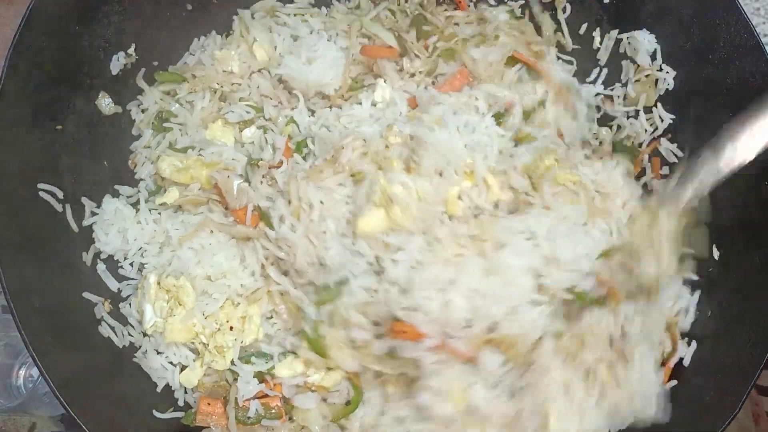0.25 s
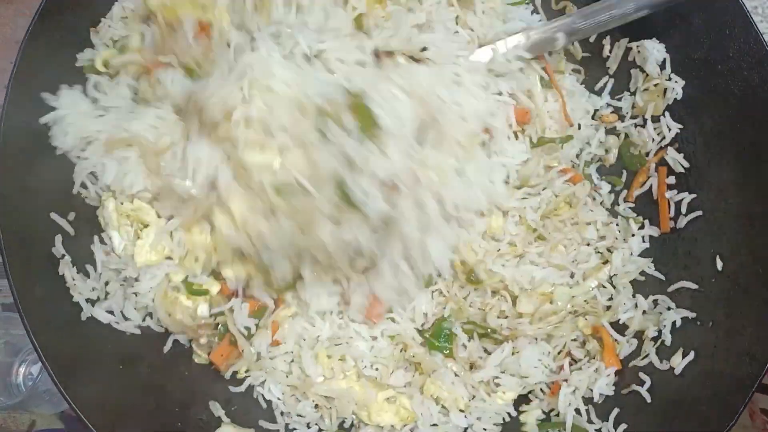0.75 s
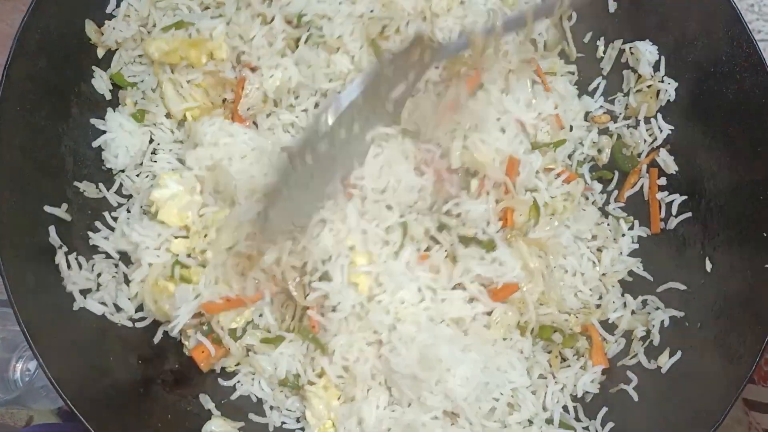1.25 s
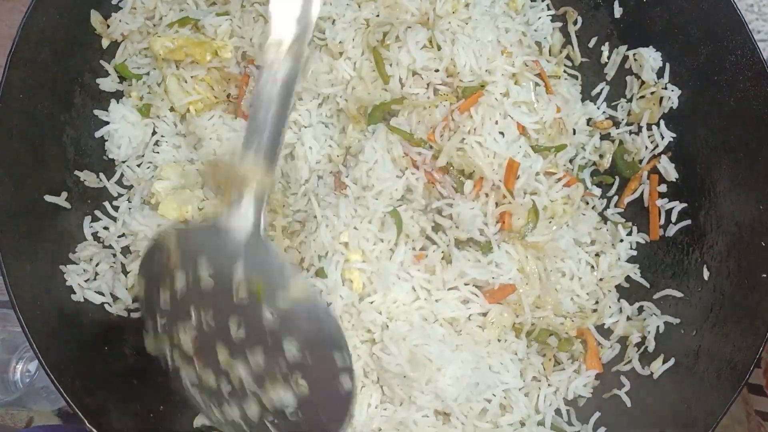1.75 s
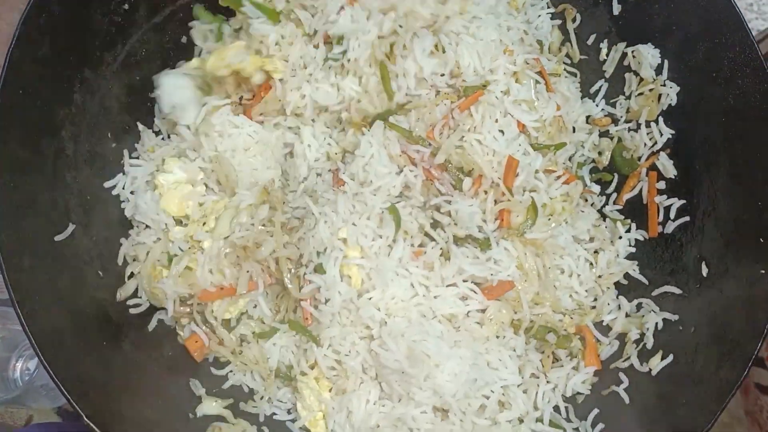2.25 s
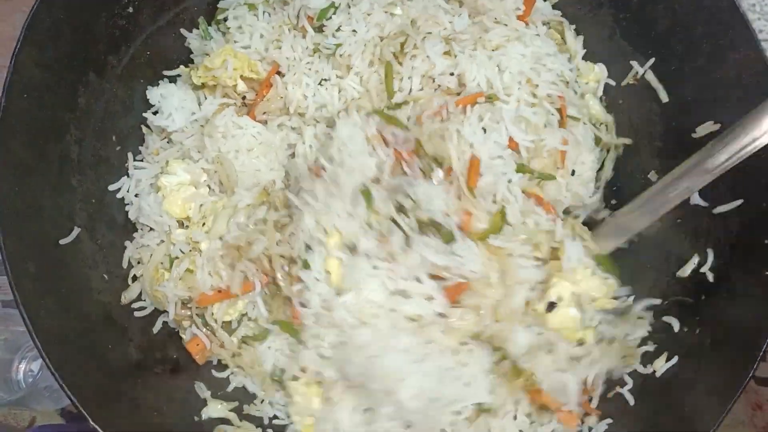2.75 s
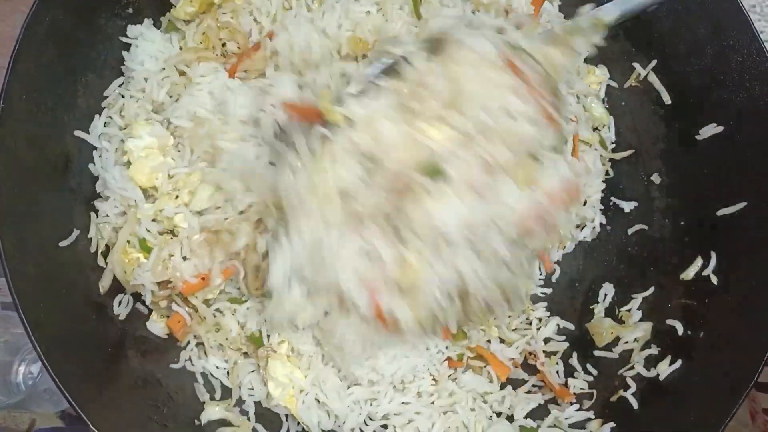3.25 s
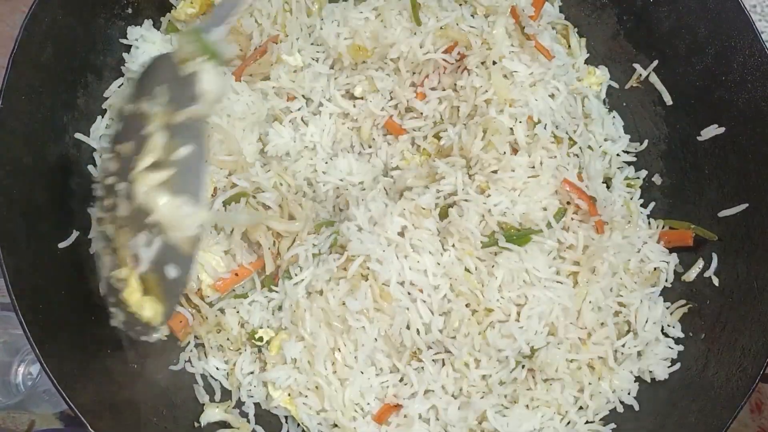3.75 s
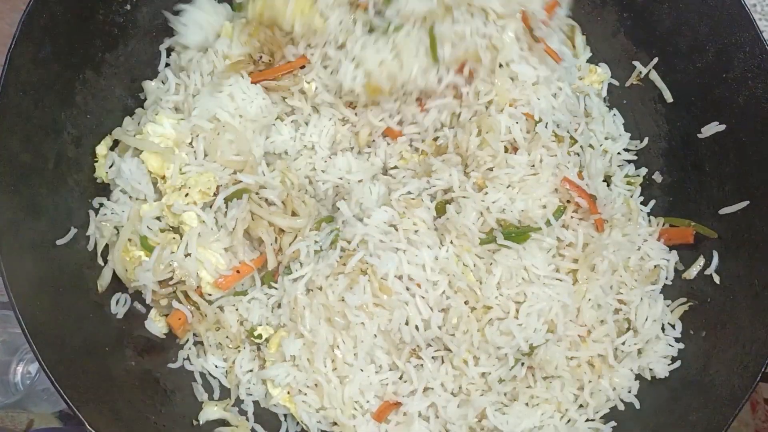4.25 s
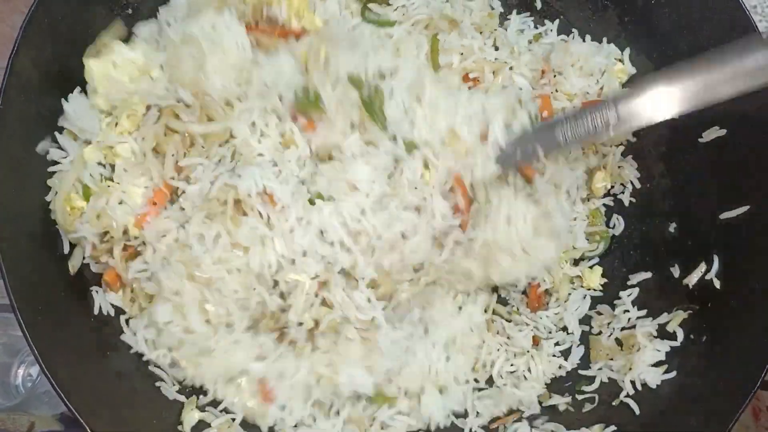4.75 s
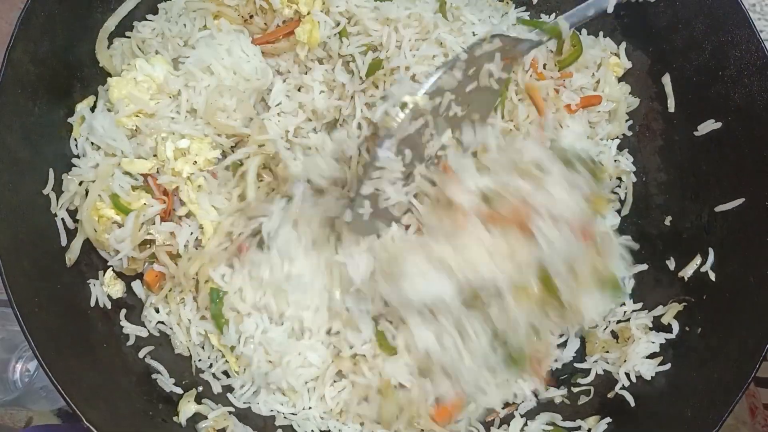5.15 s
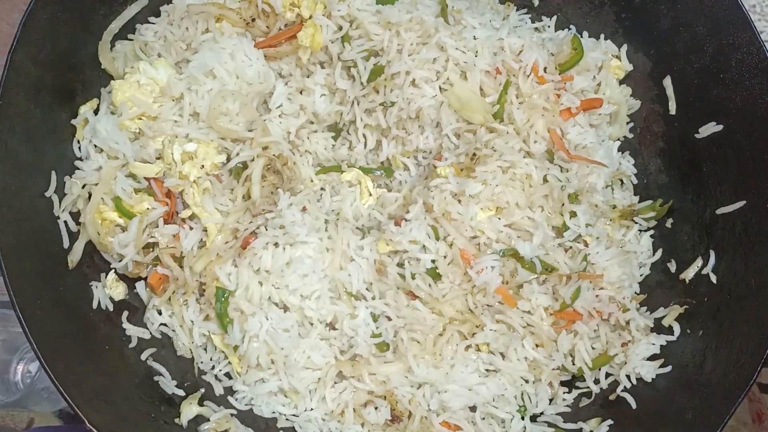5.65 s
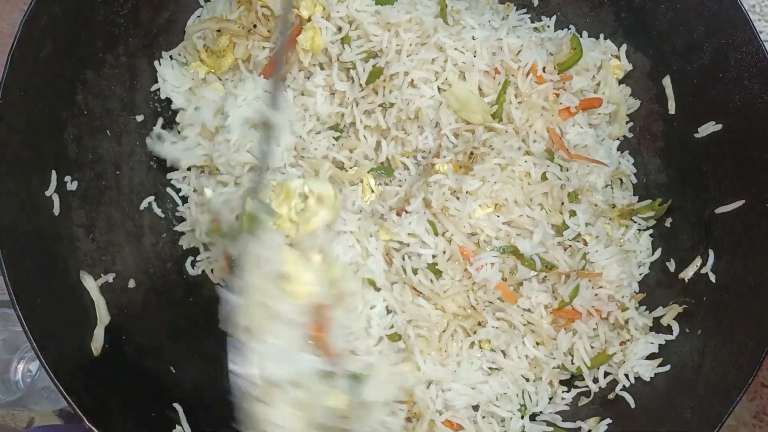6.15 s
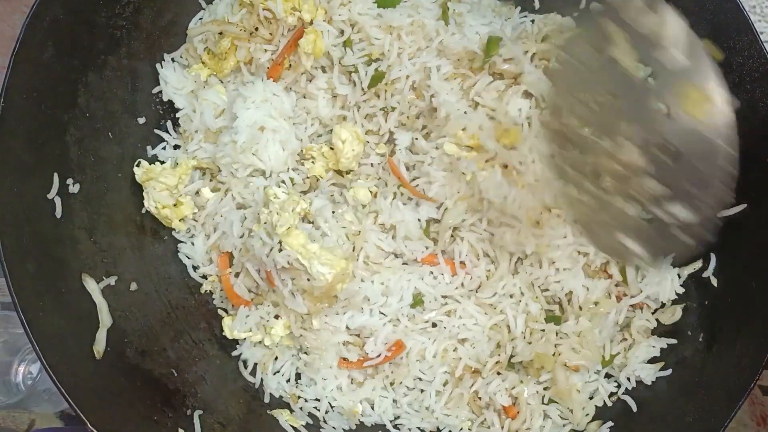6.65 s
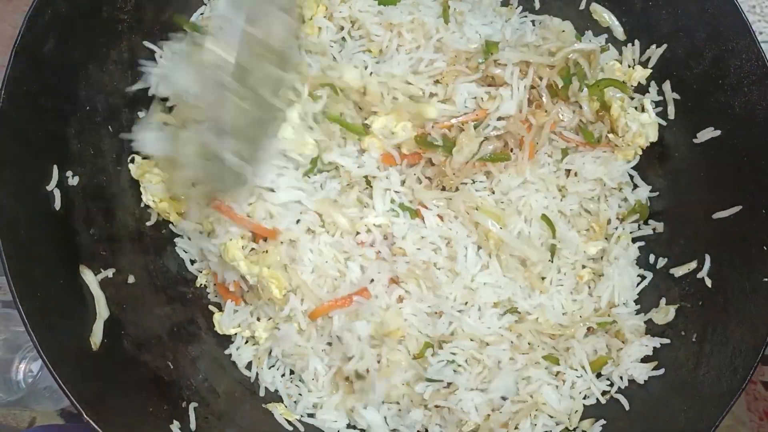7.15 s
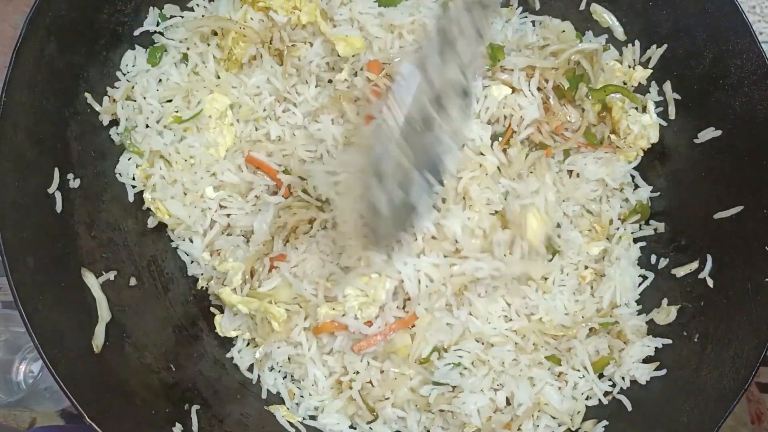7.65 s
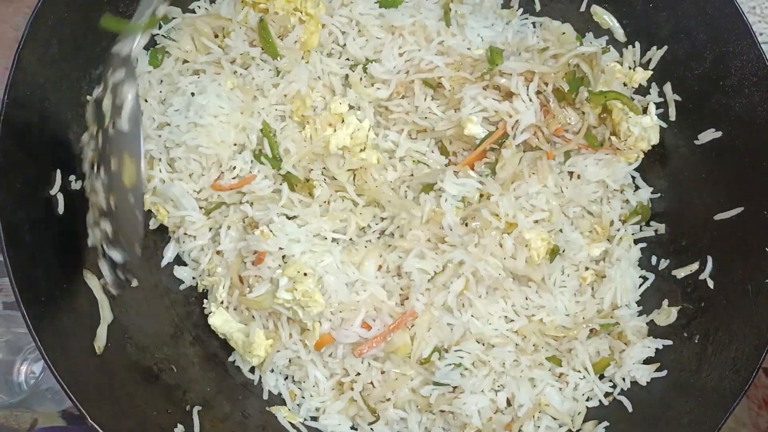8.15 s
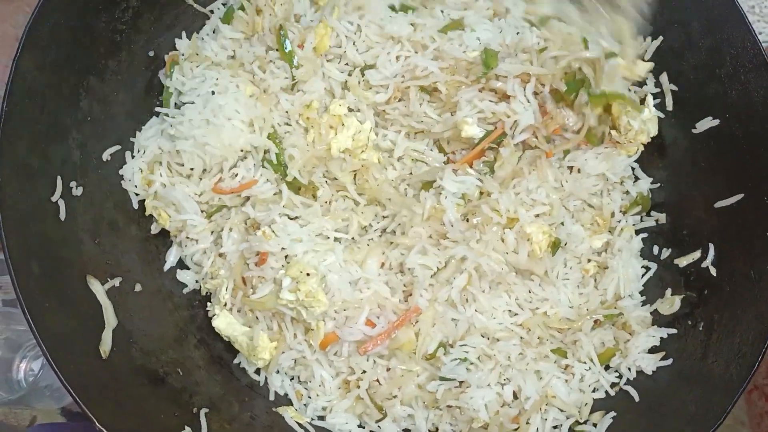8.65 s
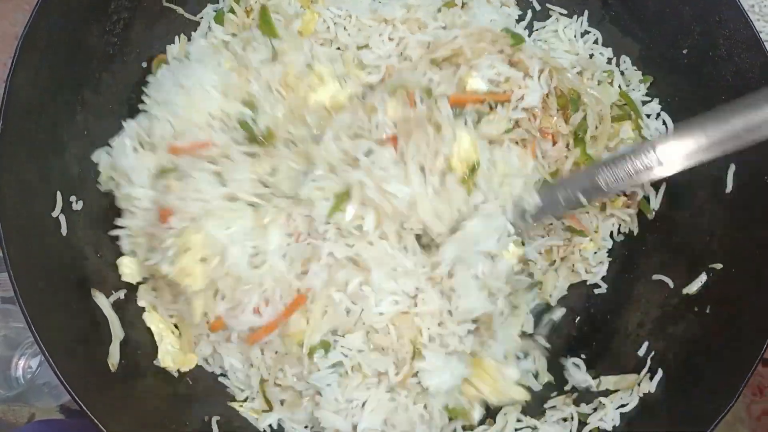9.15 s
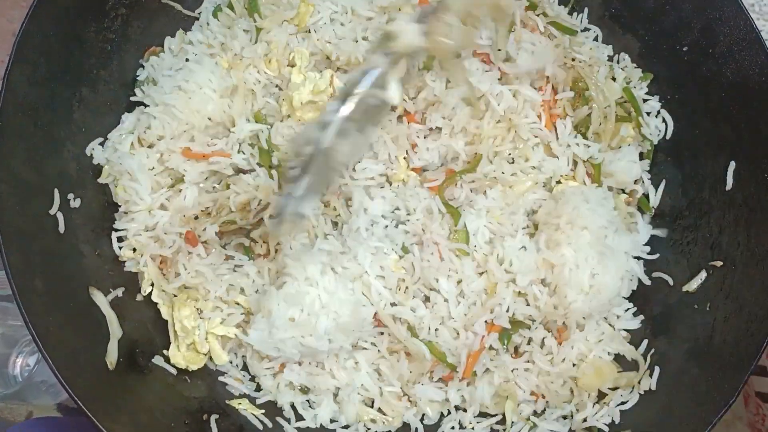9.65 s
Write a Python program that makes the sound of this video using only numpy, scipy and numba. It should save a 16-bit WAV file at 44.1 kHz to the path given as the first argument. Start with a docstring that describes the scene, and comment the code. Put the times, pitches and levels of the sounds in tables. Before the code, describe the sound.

Throughout, rice fries with a light, dense sizzle of tiny crackles, a little uneven, over faint low burner and room air. From 0.1 to 0.8 s wet rice rustles and a spatula scoops softly, with a few oil pops and a slight scrape near 0.9. Two short metal knocks on the rim ring at 1.3 and 1.5 s. A bright, gritty scrape of steel on steel runs from 2.0 to 2.45. Softer scoops follow at 2.8 and 4.6 to 4.8, around a clink at 3.95 and a rising scrape until 4.4. Another scrape runs 5.8 to 6.35, loudest near 6.05 and 6.3. Oil pops cluster from 6.6 to 8.1, with a faint hollow tap at 7.0. A clank at 8.2 leads into a strong scrape from 8.35 to 8.75 with a dull wok wobble. A light scoop at 9.1 leaves the sizzle alone to the end, just before 10 s. Close stereo, dry and crisp.

```python
"""At a hot steel wok, fried rice sizzles, heard from close above by two microphone ports of unlike colour.
The sizzle is thousands of random clicks, each turned into a short puff of noise; louder oil pops stand out.
A metal spatula knocks on the rim, lands on the steel and scrapes round the bowl under the rice:
blows ring the steel's modes (its natural pitches), and scraping drives them with many tiny slips.
The wok rocks dully on its stand, a small hollow thing is tapped farther off, and low air noise lies beneath."""
import sys
import numpy as np
from scipy import signal
from scipy.fft import rfft, irfft, next_fast_len
from scipy.io import wavfile
from scipy.ndimage import uniform_filter1d
from numba import njit

SR = 44100
rng = np.random.default_rng(int(sys.argv[2]) if len(sys.argv) > 2 else 0)


def int16_out(signal):
    """Quantize to a 16-bit WAV file."""
    q = np.round(np.clip(np.atleast_2d(signal).T, -1, 1) * 32767)
    wavfile.write(sys.argv[1], SR, q.astype(np.int16))


N = 436149   # length in samples

# natural pitches of wok and spatula, with relative levels for each kind of touch:
# (pitch_hz, free_t60_s, knock_db, landing_db, scrape_db, left_minus_right_db)
STEEL_MODES = [(108.7, 0.33, -2, -19, -44.5, 2), (157, 0.28, 4, -39, -50, 1), (240, 0.16, -12, 6.5, -39, 3),
               (344, 0.14, -27, -16, -37, 2), (451.4, 0.17, -14.5, -33.5, -35.5, 20),
               (470, 0.22, -10.5, -27.5, -31, -18.5), (884, 0.015, 7, -21, -42.5, -1.5),
               (905, 0.053, 9.5, -36, -40, -16), (996, 0.22, -4, -16.5, -40, -9.5),
               (1084, 0.0063, 8, -44, -40, -6), (1233, 0.038, -9, 7.5, -12.5, -4),
               (1540, 0.11, -6, -7, -33, 8.5), (1802, 0.049, -17, 3, -14.5, 3.5),
               (2174, 0.055, -14, 11, -16, -9), (2295, 0.048, -9, -7, -10, -2),
               (2427, 0.097, -12, -26, -13.5, -6.5), (2585, 0.25, -4.5, -28, -22, -6),
               (3134, 0.021, -22, 18.5, -6, 3.5), (3320, 0.11, -33, 7, -17, -12),
               (3322, 0.039, -23, 16.5, -14, -17), (3664, 0.075, -26, 14.5, -11, 14.5),
               (4070, 0.065, -25, -18, -14, -25), (4406, 0.044, -25, 5.5, -4, 22.5),
               (4332, 0.056, -15, -4, -3.5, -7.5), (4399, 0.059, -30, -17, -1, 2.5),
               (4516, 0.091, -7, 2.5, -4.5, 21.5), (4500, 0.26, -9.5, 5, -29, 3.5),
               (4710, 0.09, -22, 10, -0.5, 6), (5060, 0.11, -19.5, -1, -15, 17.5),
               (6780, 0.05, -23, -7, -23.5, 23.5)]
BODY_TOP_HZ = 1100   # modes below this are the body of a blow; scraping rings only those above


def amp(db):
    """Gain of a level in dB."""
    return 10 ** (np.asarray(db) / 20)


def rms_one(x):
    """Scale a sound to an average strength (rms) of 1."""
    return x / np.sqrt(np.mean(x ** 2) + 1e-20)


def band(x, low_hz, high_hz, order):
    """Keep only the sound between two pitches."""
    return signal.sosfilt(signal.butter(order, [low_hz, high_hz], "band", fs=SR, output="sos"), x)


def high_pass(x, hz, order):
    """Weaken the sound below a pitch."""
    return signal.sosfilt(signal.butter(order, hz, "high", fs=SR, output="sos"), x)


def in_time(tables):
    """Columns of joined tables at every sample, and a gate that is open within the tables."""
    t = np.arange(N) / SR
    s, *columns = np.concatenate(tables).T
    gate = sum((t > rows[0][0]) & (t < rows[-1][0]) for rows in tables)
    return [np.interp(t, s, c) for c in columns], uniform_filter1d(gate * 1., size=600)


def swells(events, rise_db_per_s, fall_db_per_s, rest_db):
    """Level in dB of events that rise, hold and fall; the loudest counts."""
    start, length, peak_db = np.transpose(events)[:, :, None]
    t = np.arange(0, N + 50, 50) / SR   # every 50th sample is enough
    under_db = np.maximum(rise_db_per_s * (start - t), fall_db_per_s * (t - start - length))
    loudest_db = np.max(peak_db - np.maximum(under_db, 0), axis=0)
    return np.interp(np.arange(N) / SR, t, np.maximum(loudest_db, rest_db))


def colour(x, hz, db):
    """Minimum-phase filter with the given levels on a log-frequency axis."""
    size = next_fast_len(N + 8192)
    grid = np.maximum(np.fft.rfftfreq(8192, 1 / SR), 10)
    cepstrum = irfft(np.log(amp(np.interp(np.log(grid), np.log(hz), db))))
    # folding the cepstrum forward makes the filter respond as early as it can
    cepstrum[1:4096] *= 2
    cepstrum[4097:] = 0
    response = irfft(np.exp(rfft(cepstrum)))
    return irfft(rfft(x, size) * rfft(response, size), size)[..., :N]


def drift(rate_hz):
    """Slow random wandering of spread 1, computed at every 20th sample."""
    r = np.exp(-2 * np.pi * rate_hz * 20 / SR)
    noise = rng.standard_normal(N // 20 + 2002)
    slow = signal.lfilter([1], [1, -2 * r, r * r], noise)[2000:]
    return np.interp(np.arange(N) / 20, np.arange(len(slow)), rms_one(slow))


def clicks(times, gains):
    """A click at each time."""
    out = np.zeros(N)
    out[np.round(np.asarray(times) * SR).astype(int)] = gains
    return out


def grains(per_s, spread_db, clump_db, clump_hz):
    """Clicks at random moments, of uneven size, coming in clumps."""
    sizes = amp(spread_db * np.minimum(rng.exponential(1, N), 4)) * rng.choice([-1, 1], N)
    chance = per_s * amp(clump_db * drift(clump_hz)) / SR
    return rms_one(sizes * (rng.random(N) < chance))


def bursts(x, t60, shared):
    """Each click becomes a dying puff of reflections in the bowl, only partly alike at the two ports."""
    puff = np.sqrt(signal.lfilter([1], [1, -amp(-120 / (t60 * SR))], x ** 2 + 1e-18))
    noise, share = rng.standard_normal((3, N)), np.clip(shared, 0, 1)
    return rms_one(puff * (np.sqrt(share) * noise[0] + np.sqrt(1 - share) * noise[1:]))


def ring(force, hz, t60):
    """Complex ringing of one mode; its imaginary part is a sine of height 1 for a unit click."""
    pole = amp(-60 / (t60 * SR)) * np.exp(2j * np.pi * hz / SR)
    return signal.lfilter([1], [1, -pole], force + 1e-18)


@njit
def gliding_ring(force, turn, r):
    """A resonance whose pitch moves."""
    out, z = np.zeros(len(force)), 0j
    for i in range(len(force)):
        z = z * r * np.exp(1j * turn[i]) + force[i]
        out[i] = z.imag
    return out


def gliding(hz, width_hz):
    """Noise twice through a moving resonance; rms 1."""
    turn, r = 2 * np.pi * hz / SR, np.exp(-np.pi * width_hz / SR)
    once = gliding_ring(rng.standard_normal(N), turn, r)
    return rms_one(gliding_ring(once, turn, r))


def port_turns(hz):
    """Random phase of each mode at the right port: high modes arrive out of step."""
    return rng.uniform(-np.pi, np.pi, np.shape(hz)) * np.minimum(hz / 2500, 1) ** 2


def air():
    """Low steady noise of burner and room air, alike at both ports in the bass."""
    # colour of the air noise: (pitch_hz, level_db)
    air_colour = [(18, -44), (30, -17), (75, -14), (124, 4), (290, -4.5), (414, -12), (490, -7),
                  (895, -13.5), (1060, -6.5), (1200, -18.5), (1560, -44.5), (2640, -120)]
    mid, side = colour(rng.standard_normal((2, N)), *np.transpose(air_colour))
    side = high_pass(side, 500, order=1)
    return amp(-67.5) * rms_one(mid + 0.61 * side * [[1], [-1]])


def taps():
    """A soft blow on a small hollow thing: a dying puff of contact noise drives its modes."""
    # taps farther off: (start_s, relative level_db)
    tap_times = [(5.036, -44), (6.983, -36)]
    # natural pitches of the hollow thing: (pitch_hz, level_db, t60_s)
    tap_modes = [(728, 5, 0.1), (670, 0, 0.099), (418, -4, 0.09), (230, -23, .07)]
    s, level_db = np.transpose(tap_times)
    fading = signal.lfilter([1], [1, -amp(-60 / (0.081 * SR))], clicks(s, amp(level_db - 37)))
    contact = fading * rng.standard_normal((2, N))
    struck = sum(amp(db) * ring(contact[0] + 0.55 * contact, hz, t60).imag for hz, db, t60 in tap_modes)
    return band(struck, 170, 850, order=2)


def rocking():
    """The loaded wok shudders on its stand: noise rings one low, quickly dying resonance."""
    # the wok rocks: (start_s, length_s, level_db)
    rocks = [(1.63, 0.016, -51), (1.87, 0.023, -47), (3.99, 0.04, -55), (6.385, .03, -55),
             (7.54, 0.025, -56.5), (8.3, .04, -46), (8.74, 0.14, -49)]
    shudder = ring(rng.standard_normal(N), 122.6, 0.065).imag
    shudder = band(shudder, 95, 190, order=2)
    return rms_one(shudder) * amp(swells(rocks, rise_db_per_s=300, fall_db_per_s=400, rest_db=-120))


def blows():
    """Knocks and landings ring the steel's modes, over a rattle that dies band by band."""
    # spatula on the rim, levels relative: (start_s, level_db, body_db, thud_db)
    knocks = [(1.291, -8.5, -9, -26), (1.464, -9.5, -9.5, -28)]
    # spatula edge meets the steel, levels relative: (start_s, level_db, body_db, thud_db)
    landings = [(2.005, -30, -47, -47), (3.945, -16.5, -4.5, -28), (4.2325, -31.5, -35, -58),
                (5.7578, -32, -25, -44), (8.2246, -21, -6, -32.5), (8.3432, -40, -22, -37)]
    # dense rattle after a blow, relative to its level: (low_hz, high_hz, level_db, t60_s)
    knock_rattle = [(90, 900, -19.5, 0.3), (610, 1070, -7.5, 0.031), (1870, 5140, -16, 0.075)]
    landing_rattle = [(189, 550, -31, 0.21), (2870, 5000, -6, 0.041), (5500, 16000, -18, .02)]
    thud_top_hz, scatter_db = 270, 1.5   # modes below are the thud; random spread of mode levels
    hz, t60, knock_db, land_db, _, pan_db = np.transpose(STEEL_MODES)[:, :, None]
    t, out = np.arange(SR // 2) / SR, np.zeros((2, N + SR))
    # (events, mode levels in dB, body lift in dB, thud lift in dB, rattle bands)
    kinds = [(knocks, knock_db - 10.5, 3.0, 22.0, knock_rattle),
             (landings, land_db - 22.0, 22.0, 30.0, landing_rattle)]
    for events, mode_db, body_lift_db, thud_lift_db, rattles in kinds:
        for s, level_db, body_db, thud_db in events:
            weight_db = np.select([hz < thud_top_hz, hz < BODY_TOP_HZ],
                                  [thud_db + thud_lift_db, body_db + body_lift_db])
            size = amp(level_db + mode_db + weight_db + scatter_db * rng.standard_normal(hz.shape))
            size = size * amp(-60 * t / t60)
            size = size * (1 - np.exp(-t * hz * 0.5))   # low modes swell in later
            beat_hz = rng.uniform(21.9, 60, hz.shape)   # split modes beat
            size = size * (1 + 0.78 * (hz > 200) * np.cos(2 * np.pi * beat_hz * t))
            phase = -2 * np.pi * hz * t   # the blow pulls the steel away first
            left = np.sum(size * amp(pan_db / 2) * np.sin(phase), axis=0)
            right = np.sum(size * amp(-pan_db / 2) * np.sin(phase + port_turns(hz)), axis=0)
            blow = np.array([left, right])
            for low_hz, high_hz, rattle_db, rattle_t60 in rattles:
                noise = rng.standard_normal((3, len(t)))
                unlike = min(low_hz / 2000, 1.5)   # higher bands differ more between the ports
                rattle = rms_one(band(noise[0] + unlike * noise[1:], low_hz, high_hz, order=2))
                blow += rattle * amp(level_db + rattle_db - 60 * t / rattle_t60)
            at = round(s * SR)
            out[:, at:at + len(t)] += blow
    return out[:, :N]


def scraping():
    """Stick-slip of the edge: the upper modes ring short, damped by the rice, and flare up unevenly."""
    # the edge scrapes the steel, one list a stroke, levels relative:
    # (time_s, edge_pressure_db, bowl_ring_db, bowl_ring_hz, blade_hum_db, blade_hum_hz)
    scrapes = [
        [(0.72, -59, -66, 986, -65, 357), (0.746, -51, -70, 1030, -76, 383), (0.786, -61, -60, 1030, -67, 373),
         (0.8, -50, -52, 1026, -63, 362), (0.85, -51, -59, 960, -58, 346), (0.884, -58, -50, 1010, -71, 358),
         (0.902, -60, -56, 992, -92, 357), (0.928, -53, -49, 983, -84, 463), (0.978, -51, -56, 984, -81, 440),
         (1.0, -59, -69, 994, -90, 413)],
        [(1.97, -51, -70, 1010, -84, 367), (2.008, -31.5, -64, 1020, -60, 362),
         (2.074, -34.5, -54, 950, -42, 372), (2.126, -26.5, -41, 930, -55, 430),
         (2.192, -25.5, -38.5, 930, -50.5, 365), (2.288, -32.5, -43, 947, -58, 463),
         (2.344, -36.5, -33.5, 956, -62.5, 422), (2.392, -36, -44, 970, -79, 414),
         (2.424, -34, -39, 960, -73, 425), (2.47, -69, -80, 930, -92, 444)],
        [(3.97, -40, -61, 1030, -47, 350), (4.04, -39.5, -48, 860, -49, 379), (4.08, -30.5, -46, 863, -53, 408),
         (4.162, -35, -50, 903, -54, 415), (4.198, -40, -50, 946, -80, 426), (4.242, -26.5, -42, 949, -58, 402),
         (4.286, -23, -39.5, 912, -68, 483), (4.328, -22.5, -43, 953, -49, 500),
         (4.388, -31, -45, 912, -75, 498), (4.43, -51, -67, 1010, -91, 403)],
        [(5.76, -38, -35, 983, -56, 393), (5.806, -52, -50, 907, -60, 413), (5.952, -35, -58, 990, -67.5, 470),
         (6.044, -26, -39, 960, -48, 507), (6.084, -28, -39.5, 970, -66, 503), (6.124, -37, -45, 944, -73, 480),
         (6.196, -39.5, -39.5, 966, -53, 522), (6.258, -36.5, -39.5, 1004, -67, 436),
         (6.33, -28, -35.5, 960, -53, 358), (6.39, -73, -59, 960, -84, 384)],
        [(8.33, -48, -74, 900, -82, 402), (8.388, -32, -45, 867, -52, 415), (8.44, -28, -36.5, 930, -68, 420),
         (8.472, -35, -45, 940, -57, 418), (8.562, -26.5, -53, 980, -58, 418),
         (8.584, -22.5, -45, 970, -60, 460), (8.672, -28, -37, 907, -50, 483),
         (8.71, -29.5, -38.5, 884, -56, 484), (8.784, -63, -53, 900, -54, 510), (8.82, -76, -53, 950, -74, 487)],
    ]
    # the blade scoops through rice and barely touches the steel: (time_s, edge_pressure_db)
    scoops = [
        [(0.28, -42), (0.286, -52), (0.356, -34), (0.558, -38), (0.576, -58), (0.6, -40)],
        [(2.74, -55), (2.8, -41), (2.818, -34.5), (2.898, -40), (2.924, -46), (2.96, -44)],
        [(4.56, -58), (4.58, -46), (4.608, -33), (4.772, -45), (4.79, -36.5), (4.86, -63)],
        [(8.97, -48), (8.986, -52), (8.99, -60), (9.004, -42.5), (9.11, -37.5), (9.22, -57)],
    ]
    # colour of the rasp, relative: (pitch_hz, left_db, right_db)
    rasp_colour = [(500, -56, -63), (990, -12, -1), (1830, 5, -8), (2660, 16, 9.5), (3730, -1, 14.5),
                   (5180, 21, 9), (6600, 5.5, 1.5), (8500, -8, -3.5), (10150, 3, -44), (10200, 3, -26),
                   (11300, -9, -26), (12000, -0.5, -28), (14000, 5.5, -2), (15100, -5, -54)]
    mean_press_db = -33
    # level against the mean pressure, and share of the pressure's swing in dB that is followed
    rasp_db, rasp_follows = -14, 0.68
    lower_offset_db, lower_follows = 6, 0.54   # the same for the modes under 4 kHz
    scoop_rasp_loss_db = 5      # rice under the edge muffles the rasp
    scoop_lower_lift_db = 1.5   # a scoop sounds broader: the lower modes weigh more

    strokes = [[row[:2] for row in rows] for rows in scrapes + scoops]
    (press_db,), touching = in_time(sorted(strokes, key=lambda rows: rows[0][0]))
    (_, ring_db, ring_hz, hum_db, hum_hz), on_steel = in_time(scrapes)
    swing_db = press_db - mean_press_db
    # the lower modes already speak under a light touch
    lower_db = mean_press_db + lower_offset_db + lower_follows * swing_db
    lower_db += scoop_lower_lift_db * (1 - on_steel)
    slips = grains(5000, spread_db=3.0, clump_db=2.5, clump_hz=62.5)
    out = np.zeros((2, N))
    for hz, t60, _, _, scrape_db, pan_db in STEEL_MODES:
        if hz > BODY_TOP_HZ:
            damped = t60 * 0.43
            even = np.sqrt(2 * (1 - amp(-120 / (damped * SR))))   # rms 1 for a steady rms-1 force
            drive_db = lower_db if hz < 4000 else press_db
            drive = amp(drive_db + scrape_db - 5.5 + 3.26 * drift(8.1))
            force = np.roll(slips, rng.integers(60)) * touching * even * drive
            z = ring(force, hz, damped)
            # a second ringing leaves little sound between the modes
            z = ring(z, hz, damped * 0.39) * (1 - amp(-60 / (damped * 0.38 * SR)))
            turn = port_turns(hz) + 1.89 * drift(12.0)   # the contact moves, so the ports drift out of step
            left = z.imag * amp(pan_db / 2)
            right = (z * np.exp(1j * turn)).imag * amp(-pan_db / 2)
            out += np.array([left, right])
    out = high_pass(out, 1120, order=6)

    hz, left_db, right_db = np.transpose(rasp_colour)
    rough_db = mean_press_db + rasp_db + rasp_follows * swing_db - scoop_rasp_loss_db * (1 - on_steel)
    rough = bursts(slips, 0.066, 0.087) * touching * amp(rough_db)
    rough = np.array([colour(rough[0], hz, left_db), colour(rough[1], hz, right_db)])
    grit = drift(43)   # rough spots jolt all bands together
    edges_hz = [900, 2700, 5500, 8800, 11500, 13500, 16500]
    for low_hz, high_hz in zip(edges_hz, edges_hz[1:]):   # each band of the rasp also flickers on its own
        flicker = amp(13.5 + 1.17 * drift(12.4) + 1.1 * grit)
        out += flicker * band(rough, low_hz, high_hz, order=2)
    # bowl ring and blade hum shift in pitch as the contact travels
    bowl_ring = gliding(ring_hz, 45) * amp(ring_db + 1.2 * drift(43)) * amp([[-1.5], [1.5]])
    hum = gliding(hum_hz, 67) * amp(hum_db + 1.4 * drift(21))
    return out + (bowl_ring + hum) * on_steel


def spitting():
    """Single loud pops of oil: a short ring in a puff of noise."""
    # pops, levels relative: (start_s, level_db, left_minus_right_db, pitch_hz)
    spits = [(0.351, -27, -2, 4500), (0.456, -18, -4, 2200), (0.6023, -27, -8, 1600),
             (0.6564, -24, -0.5, 2110), (1.431, -26, -8, 1550), (3.101, -22.5, 5.0, 3780),
             (3.5365, -22.5, -3, 3420), (3.8416, -25, -2, 2350), (4.565, -26, 4, 1590),
             (4.788, -20, 1, 3540), (5.177, -26, 11, 4300), (5.2325, -28.5, 15, 3670),
             (5.6294, -25, 11, 4020), (6.613, -27, -8, 3470), (6.6583, -26, 3, 3730),
             (6.788, -24.5, 4.0, 4190), (6.8735, -25, -4, 2140), (7.135, -27, 9, 3660),
             (7.1868, -28, 13.5, 4550), (7.2918, -30, 9, 3860), (7.4524, -26, 1.5, 2360),
             (7.6555, -24, -7, 3860), (7.8954, -26, 10, 3980), (7.909, -24.5, 0, 3020),
             (8.1177, -26.5, 7, 3720)]
    t, out = np.arange(900) / SR, np.zeros((2, N + 900))
    for s, level_db, pan_db, hz in spits:
        burst = rng.standard_normal((2, 900)) * 0.55 + np.sin(2 * np.pi * hz * t)
        gain = amp(level_db + pan_db * np.array([[.5], [-.5]]))
        at = round(s * SR)
        out[:, at:at + 900] += gain * burst * amp(-60 * t / 0.0073)
    return band(out[:, :N], 1300, 5800, order=2)


def frying():
    """Thousands of steam bubbles burst each second all over the bowl; stirred rice adds a lower rustle."""
    # colour of the fizz at each port: (pitch_hz, level_db)
    fizz_left = [(700, -53.5), (1350, -10.5), (1950, -6), (2300, 1.5), (2550, -13.5), (2800, -16.5),
                 (3400, -2.5), (4200, -2.5), (5500, -12), (6700, -13), (8500, -37), (9800, -19.5),
                 (11400, -29.5), (12300, -23.5), (14500, -20), (16000, -27)]
    fizz_right = [(700, -34.5), (1250, -13.5), (1750, -10.5), (2250, -1), (2850, -5.5), (3550, -1.5),
                  (4500, -10.5), (5050, -24), (5400, -27.5), (7600, -19), (9300, -40), (10200, -40),
                  (11400, -35.5), (14100, -27), (16000, -34.5)]
    # vigour of the fizz, relative: (time_s, level_db)
    vigour = [(0, -42), (.35, -41.5), (.7, -44), (.92, -43.5), (1.3, -42.5), (1.95, -46.5), (2.55, -43),
              (3.2, -45.5), (3.9, -46), (4.5, -43.5), (4.92, -45.5), (5.1, -43), (5.7, -45.5), (6.4, -43.5),
              (7.1, -46.5), (7.45, -46.5), (7.6, -46.5), (8.2, -48), (8.9, -43), (9.25, -45), (9.6, -43.5),
              (9.89, -45)]
    # the fizz flares when a wet patch meets hot oil: (start_s, length_s, lift_db)
    flares = [(.1, 0.033, 3), (.35, 0.017, -0.5), (.84, 0.11, 1.5), (2.57, 0.036, 2), (4.74, 0.03, 1.5),
              (5.06, 0.021, 1), (6.835, .05, 4), (7.435, 0.016, 3.5), (7.9, .03, 2.5), (9.05, .12, 1),
              (9.52, 0.045, 2)]
    # wet rice tumbles over: (start_s, length_s, rustle_db)
    tumbles = [(0, 0.055, -42), (.11, 0.017, -36), (.35, 0.023, -51), (.45, .21, -38.5), (.78, .07, -41.5),
               (.97, 0.014, -52), (1.06, 0.4, -52.5), (1.56, 0.26, -53), (2.46, 0.16, -43),
               (2.85, 0.11, -44), (2.97, 0.014, -36.5), (3.09, 0.015, -43.5), (3.53, 0.0087, -49),
               (3.9, 0.076, -47.5), (4.43, 0.084, -45.5), (4.73, 0.077, -42), (5.11, 0.038, -46),
               (5.36, 0.028, -52), (5.61, .02, -46.5), (6.4, 0.04, -47.5), (6.78, 0.015, -47.5),
               (6.88, 0.029, -46), (7.13, 0.0088, -43.5), (7.46, 0.033, -54), (7.65, 0.033, -56),
               (7.92, 0.091, -51), (8.8, 0.17, -46.5), (9.13, 0.025, -40.5), (9.43, 0.018, -57),
               (9.7, 0.068, -54)]
    # colour of wet rice tumbling: (pitch_hz, level_db)
    rustle_colour = [(780, -46.5), (950, -6), (1200, 3), (1500, 1.5), (1900, 2.5), (2600, -26)]
    rustle_rest_db = -64.5
    flare_share = 0.054   # share of a tumble's rise in dB that the fizz follows, as wet grains meet hot steel

    wet_db = swells(tumbles, rise_db_per_s=310, fall_db_per_s=169, rest_db=rustle_rest_db)
    fizz_db = in_time([vigour])[0][0] + flare_share * (wet_db - rustle_rest_db)
    fizz_db += swells(flares, rise_db_per_s=250, fall_db_per_s=51, rest_db=0)
    fine = bursts(grains(2800, spread_db=-0.5, clump_db=2.0, clump_hz=26.7), 0.019, 0.17)
    crackle = bursts(grains(220, spread_db=4.5, clump_db=2.5, clump_hz=6.6), 0.0088, 0.48)
    fine += amp(-9.0) * crackle
    tinted = np.array([colour(fine[0], *np.transpose(fizz_left)),
                       colour(fine[1], *np.transpose(fizz_right))])
    # the valleys of the fizz deepen and fill as the heap shifts
    for valley_hz in [(1000, 1270), (1500, 2520), (2600, 2990)]:
        valley = signal.butter(2, valley_hz, "band", fs=SR, output="sos")
        depth = np.clip(0.3 + 0.27 * drift(1.3), 0, .65)
        tinted -= depth * signal.sosfiltfilt(valley, tinted)
    rustle = bursts(grains(650, spread_db=4.0, clump_db=4.0, clump_hz=18), 0.061, 0.18)
    rustle = colour(rustle, *np.transpose(rustle_colour))
    return amp(fizz_db + 6.5) * rms_one(tinted) + amp(wet_db) * rms_one(rustle)


def scene():
    """Everything at the two ports."""
    return air() + taps() + rocking() + blows() + scraping() + spitting() + frying()


def record(dry):
    """The deep bass rolls off and the top is cut steeply at 15.7 kHz."""
    thin = high_pass(dry, 55, order=2)
    return signal.sosfilt(signal.ellip(10, .5, 60, 15700, fs=SR, output="sos"), thin)


dry = scene()
out = record(dry)
int16_out(out)
```